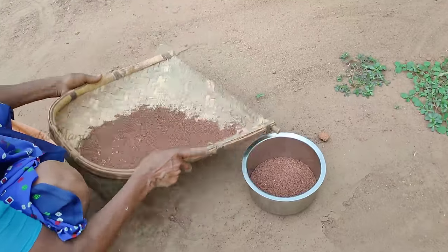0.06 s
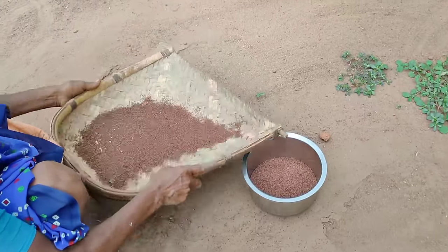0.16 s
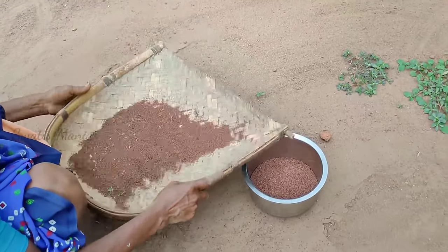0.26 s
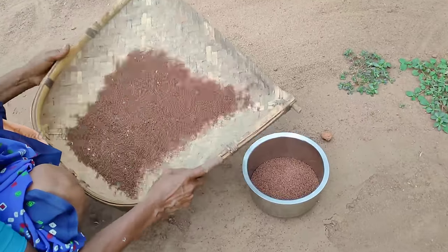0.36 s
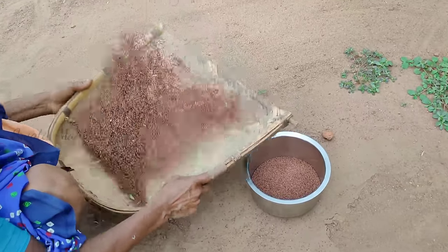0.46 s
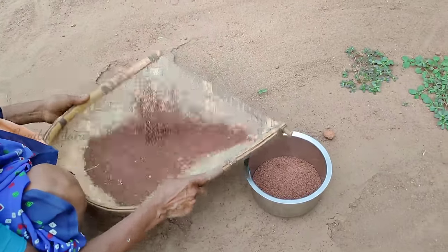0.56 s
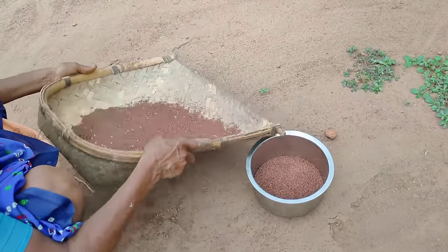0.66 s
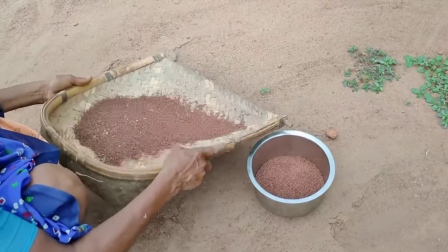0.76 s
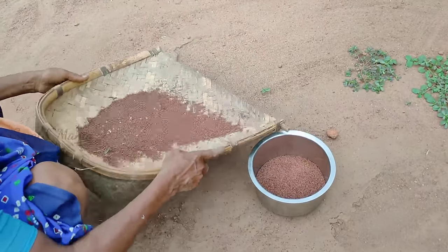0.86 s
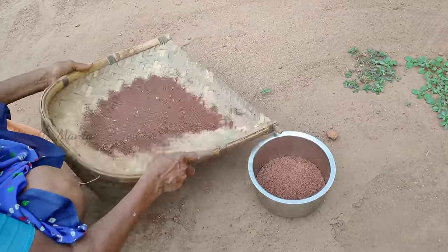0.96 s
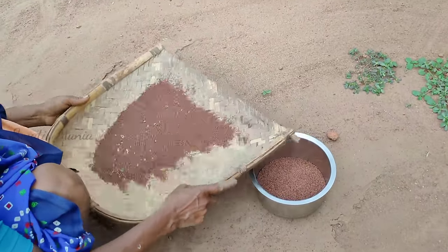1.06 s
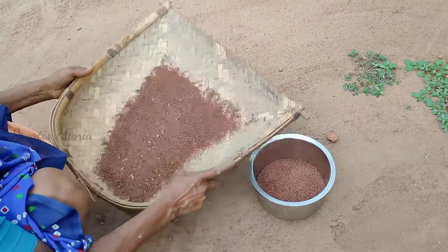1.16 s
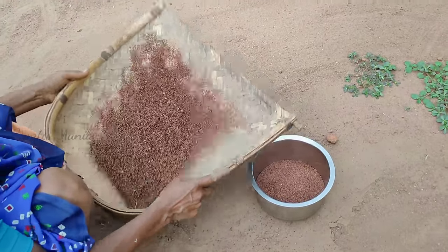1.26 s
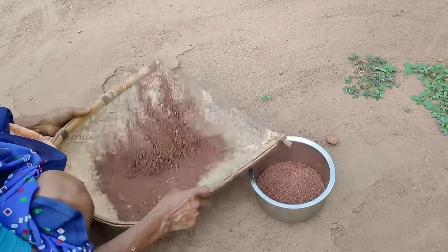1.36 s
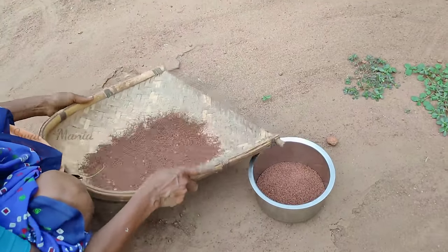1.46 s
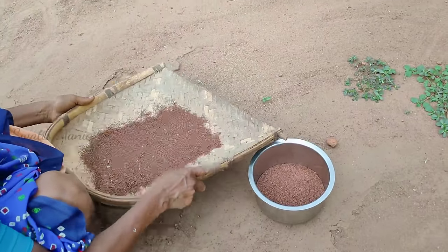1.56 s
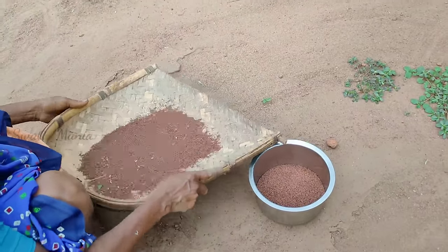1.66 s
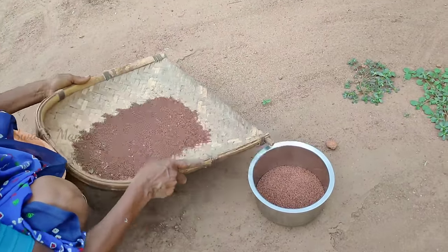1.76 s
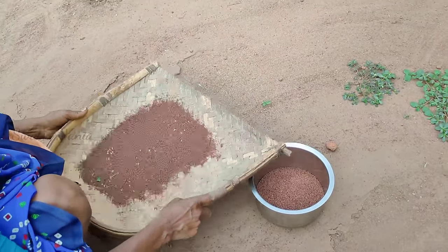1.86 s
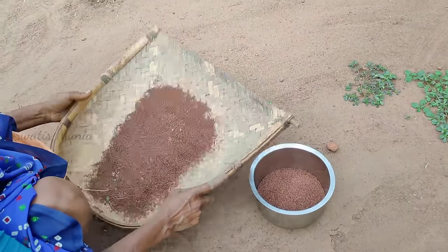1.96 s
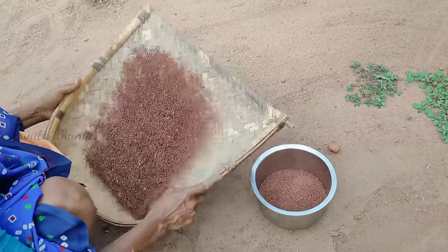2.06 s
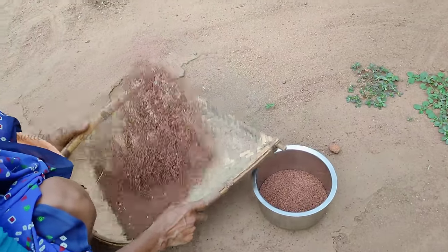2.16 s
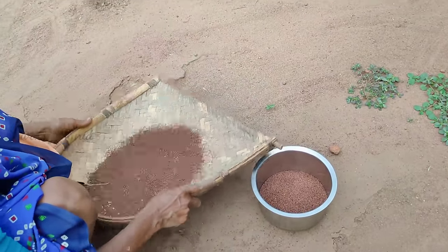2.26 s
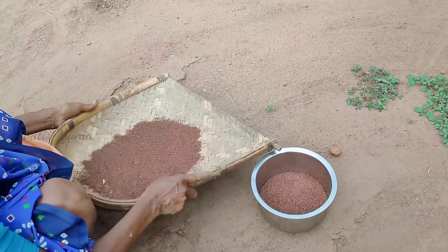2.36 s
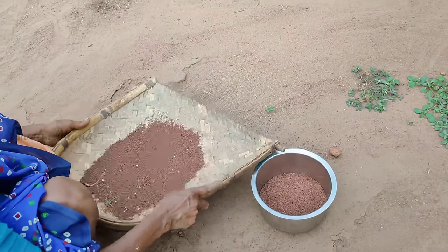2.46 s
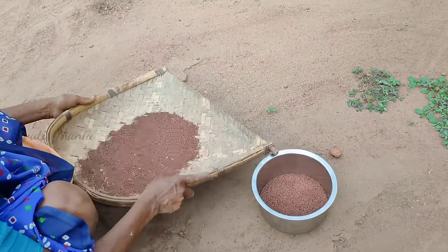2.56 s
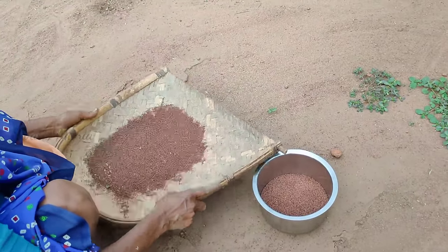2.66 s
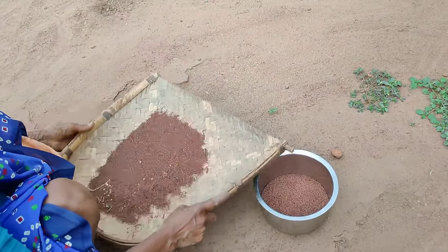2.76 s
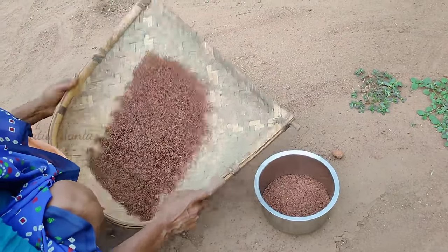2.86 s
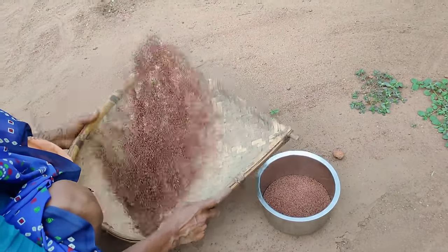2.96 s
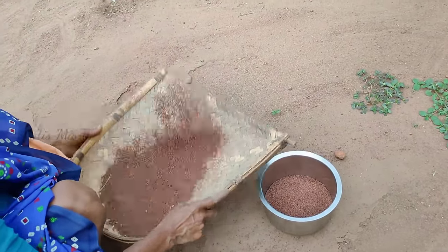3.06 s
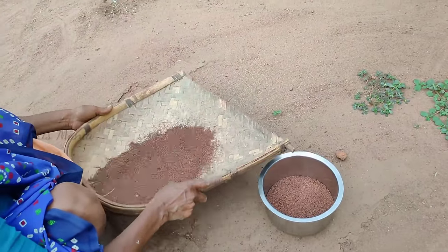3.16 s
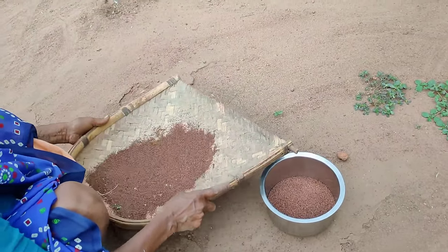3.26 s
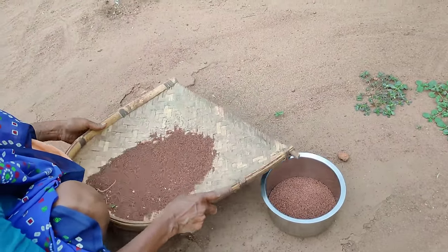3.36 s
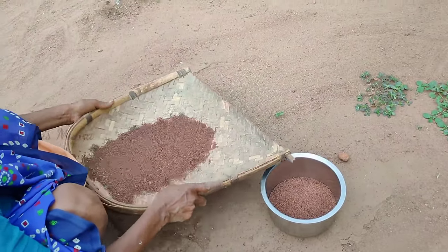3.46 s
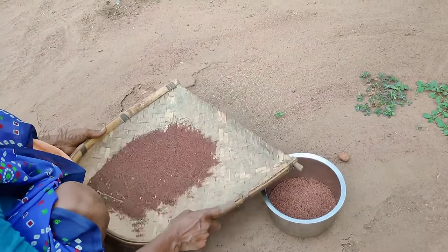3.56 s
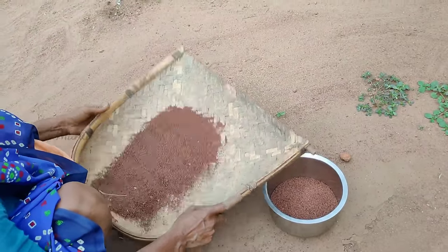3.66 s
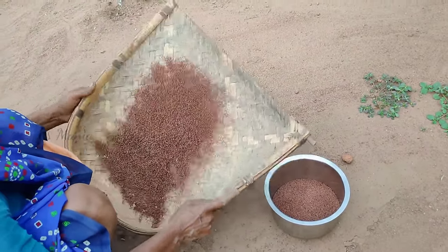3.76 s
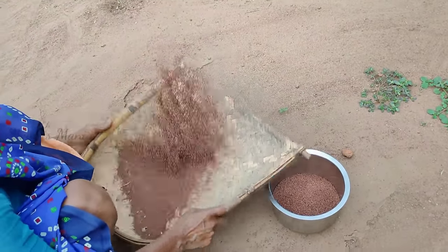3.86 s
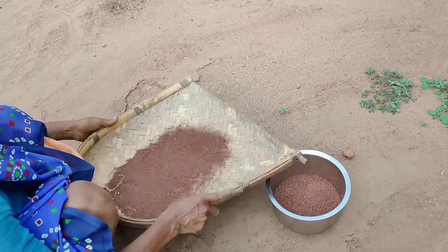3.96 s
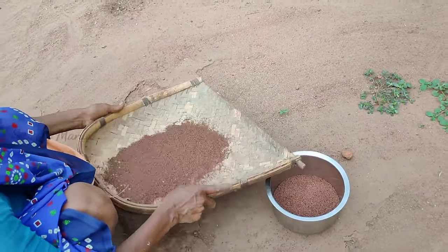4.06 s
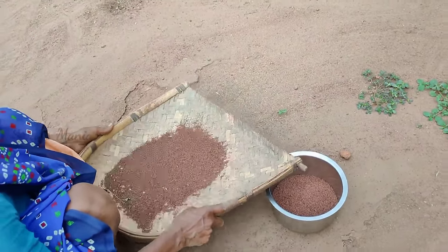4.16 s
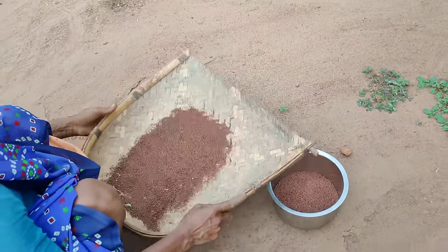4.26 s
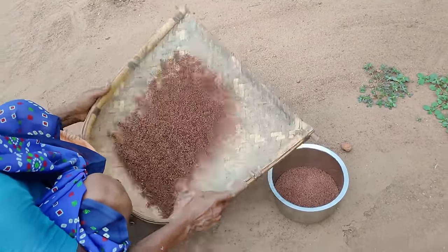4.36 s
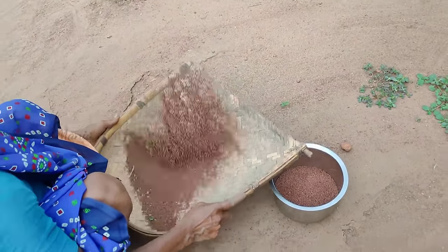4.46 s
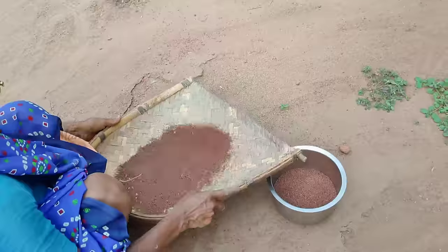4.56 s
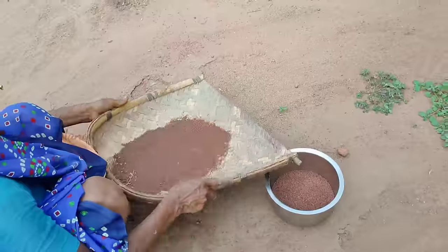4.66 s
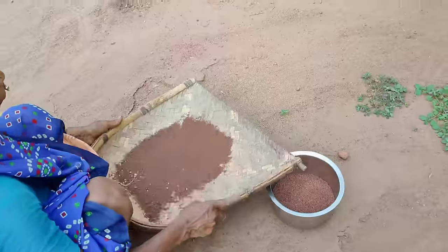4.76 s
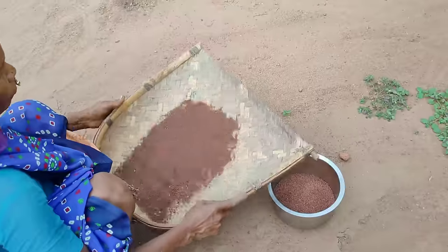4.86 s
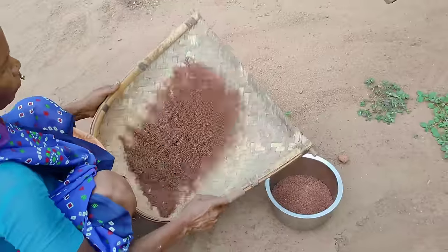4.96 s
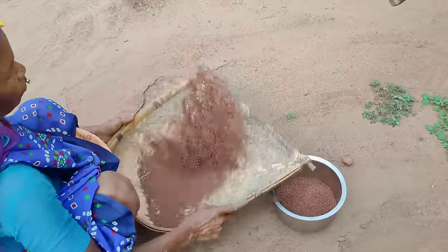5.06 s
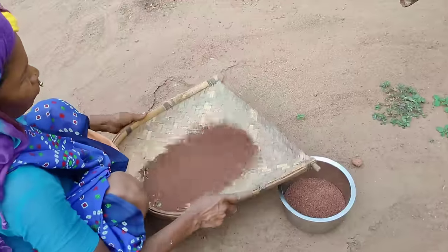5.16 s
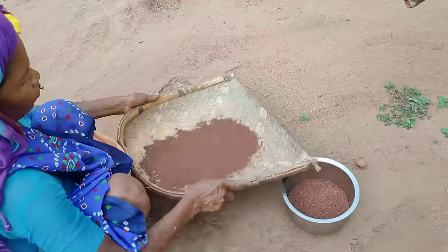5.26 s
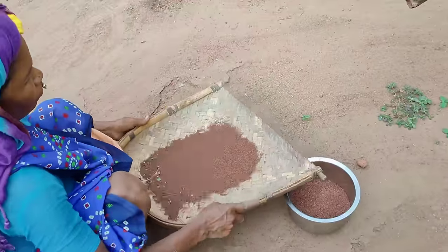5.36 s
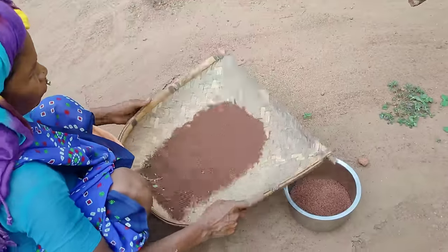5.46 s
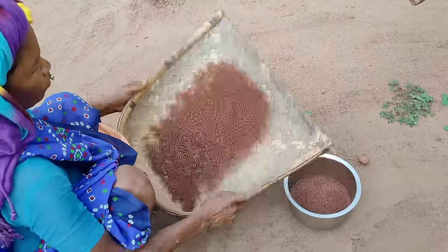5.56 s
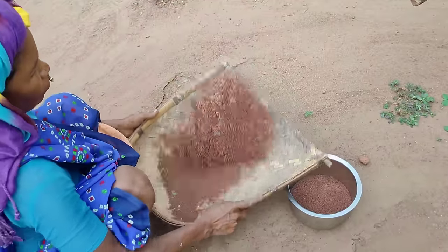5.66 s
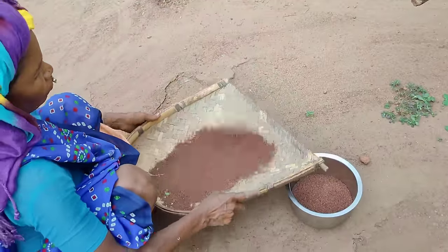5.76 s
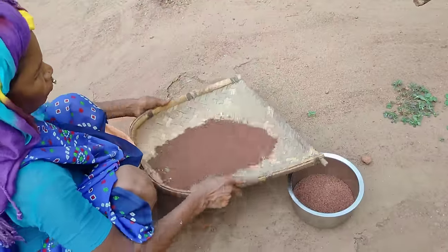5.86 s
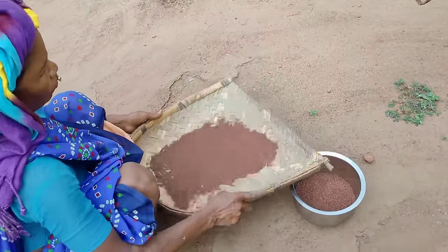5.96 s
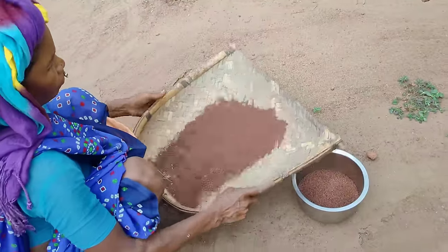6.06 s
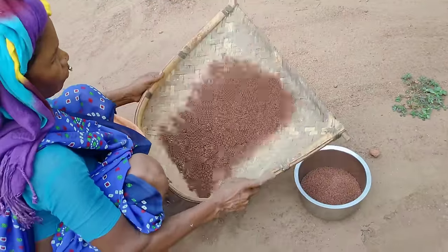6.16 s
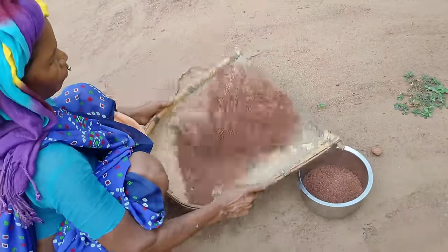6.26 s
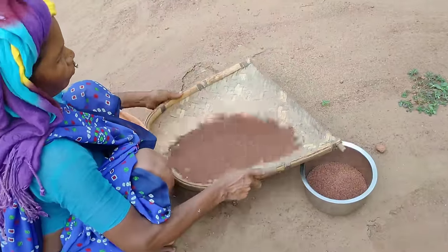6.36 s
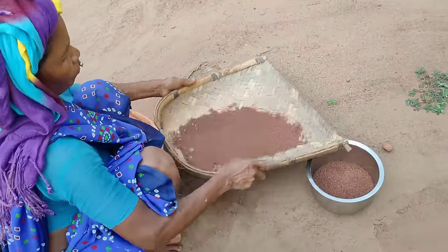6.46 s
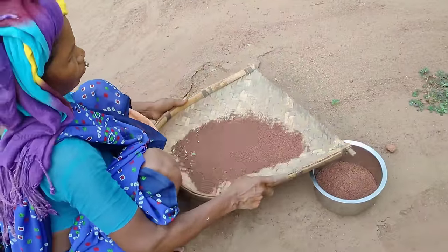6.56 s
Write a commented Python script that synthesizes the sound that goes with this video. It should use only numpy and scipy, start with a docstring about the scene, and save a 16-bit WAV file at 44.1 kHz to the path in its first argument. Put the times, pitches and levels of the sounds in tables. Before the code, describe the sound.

Dry grain hisses on a woven bamboo tray in rhythmic tosses, with woody double knocks, soft thuds, brief hushes and showers falling back.

```python
"""A shower of small dry grain fades on a woven bamboo tray in an open yard, then a double knock from the side.
The grain is a crowd of random impacts that hiss on the strips; lone grains tick and the weave murmurs.
Knocks, soft thuds, small creaks and scuffs are short pushes that ring the tray; knocks set the grain sliding.
Each toss sweeps the grain along, ends in a thud and a near silence, then the grain showers back.
Late on, dull bumps are heard on the right, while the listener moves round to the side."""
import sys
import numpy as np
from scipy import signal
from scipy.fft import rfft, irfft, next_fast_len
from scipy.io import wavfile
from scipy.ndimage import map_coordinates

SR = 44100
rng = np.random.default_rng(int(sys.argv[2]) if len(sys.argv) > 2 else 0)


def master(y):
    """Save y as 16-bit WAV."""
    cut = np.clip(np.atleast_2d(y).T, -1, 1)
    pcm = np.round(cut * 32767)  # scale
    wavfile.write(sys.argv[1], SR, pcm.astype(np.int16))


N = 291491

# where the grain is heard from as the listener moves round:
# (start_s, left_over_right_db, share of the sharper hiss [0-1])
LISTENER_VIEW = [(0, -0.7, 0.03), (2.0, -1.4, 0.01), (3.5, -1.5, 0.06), (4.4, -1, 0), (4.75, -2.5, 0.83),
                 (5.1, -4, 0.97), (5.7, -3, 0.96), (6.6, -3.5, 0.92)]
# broad hiss of grain on the strips: (pitch_hz, left_db, right_db), both relative
BROAD_HISS_SPECTRUM = [(300, -52, -36), (1700, -55, -14), (2490, -16, -10), (2530, -3.5, -11.5),
                       (3100, -6, -3), (3380, 0, -3), (4070, -8, -4.5), (5000, -0.5, -4), (5750, -6, -2),
                       (6700, -1, -4.5), (7600, 1, 1), (8900, 0, 1.5), (12600, 2, 1.9), (16500, -3.5, -3.5)]
# double knocks on the rim, each setting the grain sliding: (start_s, peak_db, cutoff_hz [higher is firmer],
# rebound_delay_ms, rebound_peak_db, slide_level_db, slide_lag_s [from knock to the slide's peak])
RIM_KNOCKS = [(0.0928, -26, 1540, 18.3, -35, -41, 0.086), (0.6634, -26, 1390, 17.8, -34, -40.5, 0.095),
              (0.9224, -24.2, 1400, 14.6, -28, -40, 0.095), (1.5059, -27, 1410, 23.5, -39, -40, 0.076),
              (1.7587, -26.5, 1490, 21, -33, -39.5, 0.082), (2.3358, -27, 1500, 20.2, -34.5, -41.5, 0.068),
              (2.5973, -26.2, 1380, 20.5, -30, -41.1, 0.078),
              (3.188, -23.7, 1700, 20.7, -36.7, -42.5, 0.063),
              (3.4531, -25.5, 1650, 19, -30.7, -40.3, 0.076),
              (4.0455, -29.2, 1480, 18.6, -36, -43.5, 0.083), (4.6593, -32.5, 1495, 17, -36.5, -42, 0.084),
              (5.251, -27.2, 1730, 19.5, -34, -37.5, 0.083), (5.85, -27.5, 1770, 18, -34.7, -41, 0.08),
              (6.443, -33, 1550, 25, -40.2, -41, 0.085)]
# tosses, each a sweep of the tray ending in a flick: (flick_s, thud_peak_db, cutoff_hz [lower is softer],
# sweep_level_db, sweep_swell_s, staying_level_db [grain that stays on the tray])
TRAY_TOSSES = [(0.3611, -35.5, 480, -39, 0.066, -70), (1.212, -42, 525, -35, 0.077, -63.5),
               (2.032, -36, 493, -36.5, 0.073, -67.5), (2.879, -34.5, 495, -36.5, 0.071, -63.5),
               (3.731, -37, 540, -37, 0.068, -60.5), (4.333, -42, 425, -38.5, 0.059, -59),
               (4.9314, -43, 405, -36.5, 0.059, -51), (5.5423, -37, 447, -37.5, 0.076, -56),
               (6.141, -33.5, 420, -37, 0.073, -53.5)]


def from_db(db):
    """Decibels become a plain gain."""
    return 10 ** (np.asarray(db) / 20)


def rms_one(x):
    """Scale a sound to an average strength (rms) of 1."""
    return x / np.sqrt(np.mean(x ** 2) + 1e-20)


def in_time(rows):
    """Each column of a curve, at every sample."""
    s, *columns = np.transpose(rows)
    return [np.interp(np.arange(N) / SR, s, column) for column in columns]


def at_hz(points, hz):
    """Each column of a spectrum, read on a log-frequency axis."""
    point_hz, *columns = np.transpose(points)
    log_hz = np.log(np.maximum(hz, 1))
    return np.array([np.interp(log_hz, np.log(point_hz), column) for column in columns])


def pan(db):
    """Left and right gains of constant power; positive is louder on the left."""
    gains = from_db(np.array([[.5], [-.5]]) * db)
    return gains / np.sqrt(np.mean(gains ** 2, axis=0))


def cut(x, hz, kind, order=2):
    """Butterworth filter: "low" keeps the lows, "high" keeps the highs."""
    return signal.sosfilt(signal.butter(order, min(hz, .45 * SR), kind, fs=SR, output="sos"), x)


def resonance(x, hz, width_hz):
    """Two-pole resonance with gain 1 on top."""
    radius = np.exp(-np.pi * width_hz / SR)
    feed = np.array([1, 0, -1]) * (1 - radius * radius) / 2
    feedback = [1, -2 * radius * np.cos(2 * np.pi * hz / SR), radius * radius]
    return signal.lfilter(feed, feedback, x + 1e-18)


def drift(rate_hz):
    """Random wander of rms 1, drawn as straight lines between chance points."""
    knots = rng.standard_normal(4096)
    return rms_one(np.interp(np.arange(N) / SR * rate_hz, np.arange(len(knots)), knots))


def coloured(pair, spectrum):
    """Two unrelated signals become a stereo sound of this spectrum, partly alike left and right; rms 1."""
    # how alike left and right are: (pitch_hz, correlation [0-1])
    likeness = [(100, 0.4), (400, 0.88), (900, 0.92), (1400, 0.85), (3000, 0.21), (6000, 0), (16000, 0.058)]
    size = next_fast_len(N)
    hz = np.arange(size // 2 + 1) * SR / size
    both = rfft(pair, size)
    # each side borrows from the other just enough to reach the correlation
    angle = np.arcsin(np.clip(at_hz(likeness, hz), -1, 1)) / 2
    mixed = both * np.cos(angle) + both[::-1] * np.sin(angle)
    return rms_one(irfft(mixed * from_db(at_hz(spectrum, hz)), size)[:, :N])


def add(out, s, sound):
    """Mix a short sound in at time s."""
    i = int(np.clip(round(s * SR), 0, N - 1))
    out[:, i:i + sound.shape[1]] += sound[:, :N - i]


def short_time():
    """Time in seconds along one short sound, a sixth of a second."""
    return np.arange(SR // 6) / SR


def surge(t, db, swell_s, fade_s, swell_shape=2, fade_shape=2):
    """Power of a rush of grain that peaks at t = 0 and is 10 dB down swell_s before and fade_s after."""
    # a shape of 2 is a bell; more is flatter on top with steeper flanks
    rise = np.abs(t / swell_s) ** swell_shape
    fall = np.abs(t / fade_s) ** fade_shape
    drop = np.where(t < 0, rise, fall)
    return from_db(db - 10 * np.minimum(drop, 20)) ** 2


def flow():
    """Level in dB of the grain moving on the weave: trickle, sweeps, showers, slides and roll-backs add in power."""
    # tossed grain showers back on the weave: (thickest_s, level_db, swell_s, fade_s)
    showers = [(-0.098, -30.1, 0.03, 0.14), (0.528, -31, 0.033, 0.1), (1.371, -30.5, 0.041, 0.093),
               (2.202, -31, 0.05, 0.093), (3.042, -33.5, 0.054, 0.13), (3.879, -34, 0.038, 0.14),
               (4.498, -35, 0.055, 0.11), (5.097, -31, 0.052, 0.12), (5.705, -31, 0.062, 0.1),
               (6.302, -31, 0.06, 0.1)]
    # between two knocks the grain rolls back across the tray: (peak_s, level_db)
    roll_backs = [(0.897, -44), (1.717, -50), (2.551, -51), (3.399, -58)]
    trickle_db = -56.5  # grain lying on the moving tray never quite stops trickling
    # the sweep is fastest just before the flick, then the grain lifts off and is airborne
    sweep_lead_s, sweep_ease_s, lift_off_s, flight_s = 0.037, 0.069, 0.0076, 0.16

    t = np.arange(0, N, 44) / SR  # one step every 44 samples, about 1 ms
    power = np.full(len(t), from_db(trickle_db) ** 2)
    for s, *_, staying_db in TRAY_TOSSES:
        power[(t > s) & (t < s + flight_s)] = from_db(staying_db) ** 2
    for s, _, _, db, swell_s, _ in TRAY_TOSSES:
        on_tray = np.exp(-np.maximum(t - s, 0) / lift_off_s)
        power += on_tray * surge(t - s + sweep_lead_s, db, swell_s, sweep_ease_s, swell_shape=2.3)
    for s, db, swell_s, fade_s in showers:
        power += surge(t - s, db, swell_s, fade_s, swell_shape=2.68, fade_shape=2.68)
    for s, *_, db, lag_s in RIM_KNOCKS:
        power += surge(t - s - lag_s, db, swell_s=0.073, fade_s=0.055, swell_shape=1.4, fade_shape=2.35)
    for s, db in roll_backs:
        power += surge(t - s, db, swell_s=0.059, fade_s=0.059)
    return np.interp(np.arange(N) / SR, t, 10 * np.log10(power))


def impacts(per_s, spread_db):
    """Grains land at random moments with random strengths; steady power whatever their rate."""
    chance = np.clip(per_s / SR, 1e-4, 1)
    weight = np.clip(rng.standard_normal((2, N)), -2, 2)
    sizes = from_db(spread_db * weight) * rng.choice([-1, 1], (2, N))
    landed = rng.random((2, N)) < chance
    return rms_one(sizes * landed / np.sqrt(chance))


def patchy_bands(x, patchy_db, patch_hz, change_hz, size=512):
    """Narrow bands of the hiss swell and fade at random, each side on its own."""
    hz, s, bands = signal.stft(x, SR, nperseg=size)
    # read a random field along pitch and time, one for each side
    place = np.meshgrid(hz / patch_hz, s * change_hz, indexing="ij")
    fields = rng.standard_normal((2, 256, 256))
    swell = np.array([map_coordinates(field, place, order=1, mode="wrap") for field in fields])
    treble = hz[:, None] ** 2 / (hz[:, None] ** 2 + 1800 ** 2)  # little swelling in the bass
    patchy = bands * from_db(patchy_db * swell * treble)
    return rms_one(signal.istft(patchy, SR, nperseg=size)[1][:, :N])


def grain():
    """More flow means more impacts a second; they hiss on the hard strips and set the weave murmuring."""
    # sharper hiss, heard from the side: (pitch_hz, left_db, right_db), both relative
    sharp_hiss = [(100, -32, -29), (300, -17, -20), (590, -11, -11), (1350, -6.5, -14.5), (1820, -6, -5),
                  (2110, -10.5, -10.5), (3240, -6, -10.5), (3670, -20.5, -23.5), (5050, -2.5, -8),
                  (6300, -3, -1.5), (7750, -1.5, -4.5), (9400, -1.7, -4), (11000, -1, 2), (16300, -3, -2)]
    # the woven floor murmurs under the grain: (pitch_hz, left_db, right_db), both relative
    floor_murmur = [(60, -35, -36), (200, -21, -22), (340, -13.5, -15), (522, -4, -4), (620, -6, -6),
                    (734, -2.5, -15), (960, -0.5, -1.5), (1250, 2.5, 3), (1330, -7.5, 5.5), (1420, -29, 1),
                    (1650, -4, -45), (1984, 2.5, -10), (2210, -25, -11.5), (4120, -12, -29)]
    flow_db = flow()
    side_db, sharp = in_time(LISTENER_VIEW)
    strength_db = flow_db + 35  # 0 is a flow of -35 dB
    per_s = 26000 * from_db(.7 * strength_db)

    hits = impacts(per_s, spread_db=3.5)
    broad_part = np.sqrt(1 - sharp) * coloured(hits, BROAD_HISS_SPECTRUM)
    sharp_part = np.sqrt(sharp) * from_db(-2.5) * coloured(hits, sharp_hiss)
    # heard from the side, the hiss has a narrow sheen near 8 kHz on the right
    sheen = resonance(impacts(per_s, spread_db=2.5), 7900, 1500)
    sheen = rms_one(resonance(sheen, 7900, 1500))
    sheen_part = np.sqrt(sharp) * from_db(-5.5 + 0.048 * strength_db) * sheen * pan(-14.0)
    hiss = patchy_bands(broad_part + sharp_part + sheen_part, patchy_db=2.5, patch_hz=192.0, change_hz=12)

    # thin sliding grain is duller than a full shower
    bass = cut(hiss, 2000, "low", order=1)
    treble = hiss - bass
    hiss = bass * pan(0.81 * side_db) * from_db(-.06 * strength_db) + treble * pan(side_db)

    murmur = coloured(impacts(per_s, spread_db=4.5), floor_murmur)
    murmur_db = -50 + 0.85 * strength_db - 6.2 * sharp
    clumps_db = 0.86 * drift(110)  # fine random unevenness of the flow
    return from_db(clumps_db) * (from_db(flow_db) * hiss + from_db(murmur_db) * murmur)


def strays(per_s=82, full_db=-54.5, follow=0.58):
    """Lone grains bounce apart from the mass and tick on the strips, also while the rest is airborne."""
    flow_db = flow()
    ticks = coloured(impacts(per_s, spread_db=3.5), BROAD_HISS_SPECTRUM)
    # full_db holds at the fullest flow; the ticks follow only a share of its swing
    return ticks * from_db(full_db + follow * (flow_db - flow_db.max()))


def yard_air():
    """The still air of the yard is a faint steady noise, strongest in the low and middle pitches."""
    # spectrum of the air: (pitch_hz, level_db [relative])
    air_spectrum = [(25, 0), (60, -8), (150, -2), (400, 4.5), (1100, -8.5), (2200, -4.5), (6000, -1),
                    (16000, -34)]
    return from_db(-68.5) * coloured(rng.standard_normal((2, N)), air_spectrum)


def tray(force, travel_s=0.00054, bend_hz=1150, bend_width_hz=750):
    """The modes answer a force; the higher ones build up a little later, and no two blows weigh them alike."""
    # ringing pitches of the tray: (pitch_hz, width_hz, level_db, left_over_right_db)
    tray_modes = [(214.5, 16, -8.5, -11), (329.5, 50, 2, -1), (393, 76, 5, 1.5), (498, 63, -2.5, -4),
                  (597, 107, -2, 7.5), (780, 210, -12.5, 45), (980, 210, 1, 28), (1058, 136, 1, -11.5),
                  (1344, 204, 3.5, -29), (1725, 130, -1.5, 26)]
    # two all-passes: the bending wave smears the blow into a short rising chirp
    force = force - 2 * resonance(force, bend_hz, bend_width_hz)
    force = force - 2 * resonance(force, 1.18 * bend_hz, 1.65 * bend_width_hz)
    out = 0
    for k, (hz, width_hz, db, side_db) in enumerate(tray_modes):
        lag = int(travel_s * SR * k / len(tray_modes))
        ring = np.pad(resonance(force, hz, width_hz), (lag, 0))[:len(force)]
        out = out + ring * from_db(db + rng.standard_normal()) * pan(side_db)
    return out


def blow(contacts, soft_hz, low_hz, crack_db, order=4):
    """Soft contacts (s, dB) on the tray; each also jolts the strips and the grain on them into a brief crackle."""
    t = short_time()
    force = np.zeros(len(t))
    for s, db in contacts:
        force[int(s * SR)] += from_db(db)
    softened = cut(force, soft_hz, "low", order=order)
    body = cut(tray(softened), low_hz, "high")
    jolt = signal.fftconvolve(force, np.exp(-t / 0.0032))[:len(t)]
    crack = resonance(jolt * rng.standard_normal((2, len(t))), 1600, 3800)
    # crack_db is the crackle's peak against the body's
    return body / np.abs(body.mean(axis=0)).max() + from_db(crack_db) * crack / np.abs(crack).max()


def knocks(bounce_s=0.00486):
    """One firm contact; the rim swings back, lands in two close touches and bounces twice more."""
    out = np.zeros((2, N))
    for s, db, soft_hz, delay_ms, rebound_db, *_ in RIM_KNOCKS:
        first = blow([(0.00067, 0)], soft_hz=soft_hz, low_hz=268, crack_db=-12.5)
        add(out, s, from_db(db) * first)
        gaps = bounce_s * rng.uniform([0, .1, .9, 1.6], [0, .4, 1.12, 2.3])
        touches_db = np.array([0.0, -9, -4, -13]) + 2.0 * rng.standard_normal(4)
        rebound = blow(zip(gaps, touches_db), soft_hz=0.91 * soft_hz, low_hz=141, crack_db=-7)
        add(out, s + delay_ms / 1000, from_db(rebound_db) * rebound)
    return out


def thuds():
    """The tray bends with a soft thud, and its whole face pushes a little air."""
    out, t = np.zeros((2, N)), short_time()
    age = t / 0.0087
    heave = np.sin(2 * np.pi * 75 * t) * age * np.exp(-age)
    for s, db, soft_hz, *_ in TRAY_TOSSES:
        thud = blow([(0, 0)], soft_hz=soft_hz, low_hz=115, crack_db=-36, order=2)
        add(out, s, from_db(db) * thud)
        add(out, s, from_db(db - 28.5) * heave * pan(-1.8))
    return out


def creaks_and_scuffs():
    """Small creaks and dry clicks in a few tiny steps; the strongest cracks are scuffs of spilling grain."""
    # (start_s, level_db, crack_db [dry crack against the body]);
    # the two rows with the strongest crack are brief scuffs of spilling grain
    small_sounds = [(0.398, -56.5, -16), (0.418, -62.5, -18), (0.437, -50, -21), (.447, -56, -3),
                    (1.28, -46.5, -10), (2.1, -47, -3), (2.911, -54.5, -14), (2.945, -47.5, -3),
                    (3.752, -52, 8), (3.765, -55, 8), (3.796, -52, -15)]
    out = np.zeros((2, N))
    for s, db, crack_db in small_sounds:
        gaps = rng.uniform([0, .002, .005], [0, .004, .009])
        steps = zip(gaps, [0, -4, -8])
        add(out, s, from_db(db) * blow(steps, soft_hz=2620, low_hz=860, crack_db=crack_db))
    return out


def yard_scatter(x, wet_db, t60):
    """Faint scatter from the ground and walls: a noise tail that fades by 60 dB in t60 seconds."""
    t = short_time()
    noise = cut(rng.standard_normal((2, len(t))), 3100, "low")
    tail = noise * from_db(-60 * t / t60) * (t > .004)
    tail /= np.sqrt(np.sum(tail ** 2, axis=1, keepdims=True))
    return x + from_db(wet_db) * signal.fftconvolve(x, tail, axes=1)[:, :N]


def bumps():
    """A dull, quickly fading swing with a soft noisy tap, heard almost only on the right."""
    # dull bumps close by: (start_s, level_db, pitch_hz)
    dull_bumps = [(3.579, -53.5, 240), (3.721, -52, 200), (3.742, -58, 130), (3.757, -57, 80),
                  (3.818, -47.5, 114), (4.006, -57, 179), (4.597, -46, 217), (4.678, -39.5, 245),
                  (4.725, -50, 262), (4.797, -49.5, 263), (4.825, -43.5, 190), (4.946, -46.5, 186),
                  (5.007, -47, 250), (5.012, -52.5, 231)]
    out, t = np.zeros((2, N)), short_time()
    for s, db, hz in dull_bumps:
        age = t * hz / 0.33
        swing = np.sin(2 * np.pi * hz * t) * age * np.exp(1 - age)
        fading_noise = rng.standard_normal(len(t)) * np.exp(-t / 0.01)
        tap = cut(resonance(fading_noise, 370, 360), 1350, "low")
        bump = cut(swing, 0.38 * hz, "high") + from_db(-2.0) * tap / np.abs(tap).max()
        add(out, s - .001, from_db(db) * bump * pan(-29.0))  # begins 1 ms before start_s
    return out


def scene():
    """Grain, lone ticks, blows on the tray, bumps and the air of the yard sound together."""
    blows = yard_scatter(knocks() + thuds() + creaks_and_scuffs(), wet_db=-22.5, t60=0.069)
    # from the front the rim lies nearer the left ear, so the right hears it up to 0.1 ms later
    _, sharp = in_time(LISTENER_VIEW)
    n = np.arange(N)
    blows[1] = np.interp(n - .0001 * SR * (1 - sharp), n, blows[1])
    return grain() + strays() + blows + bumps() + yard_air()


def record(dry):
    """The deepest rumble is rolled off and the top is cut steeply."""
    thinned = cut(dry, 43, "high")
    steep = signal.ellip(12, .1, 80, 15600, fs=SR, output="sos")  # cut above 15.6 kHz
    return signal.sosfilt(steep, thinned)


dry = scene()
out = record(dry)
master(out)
```